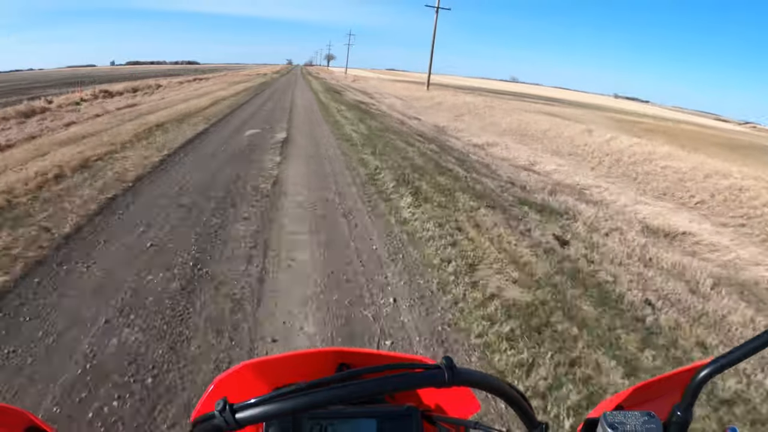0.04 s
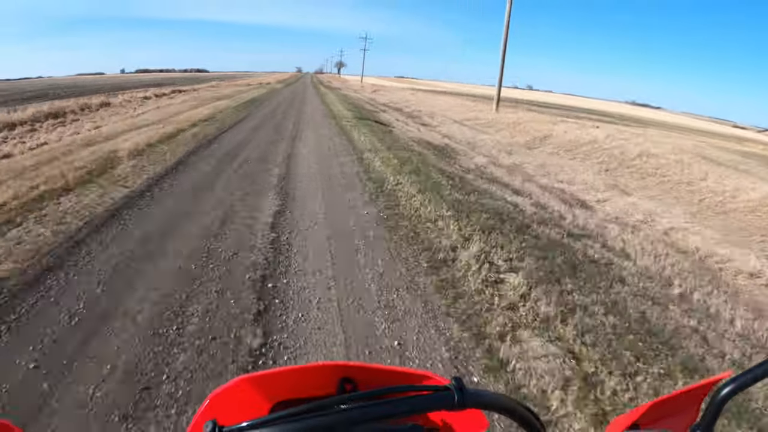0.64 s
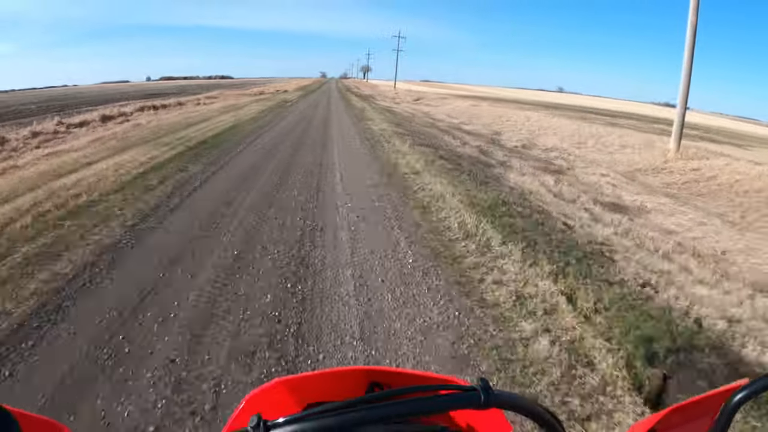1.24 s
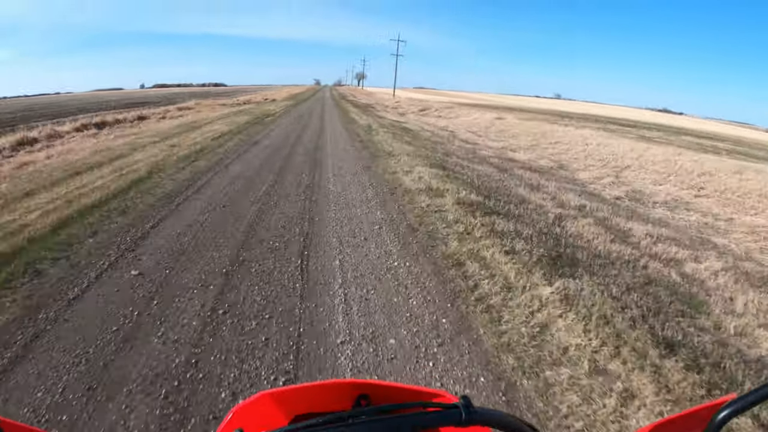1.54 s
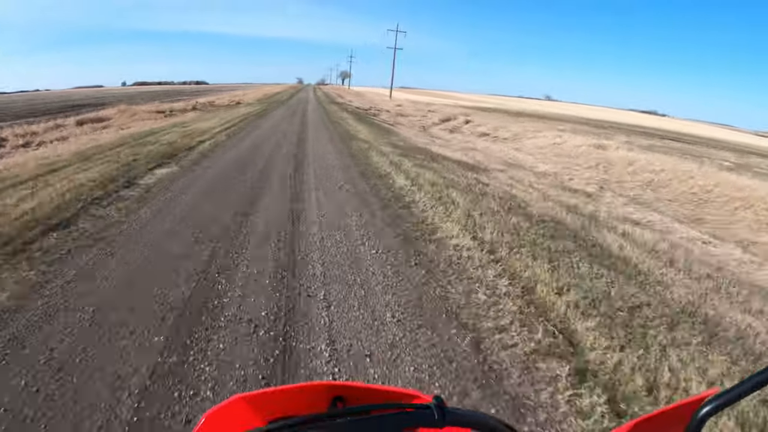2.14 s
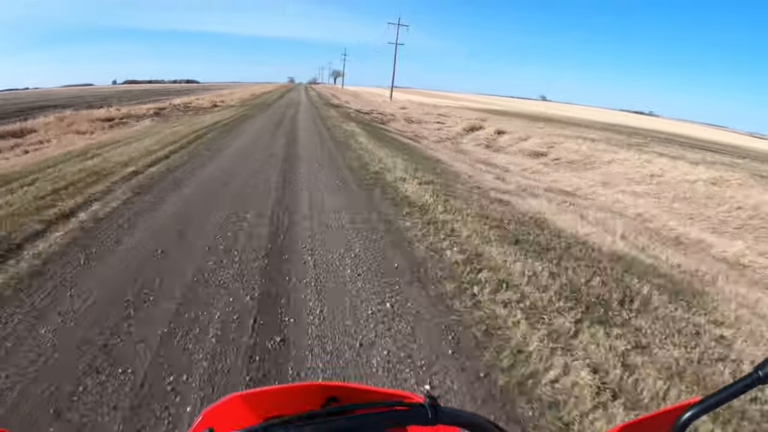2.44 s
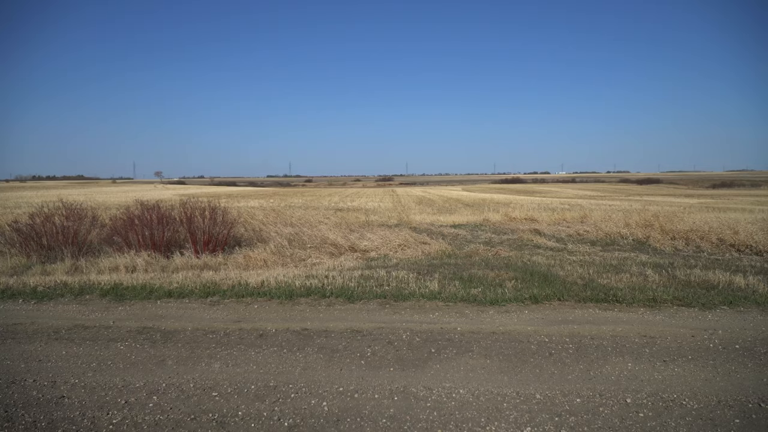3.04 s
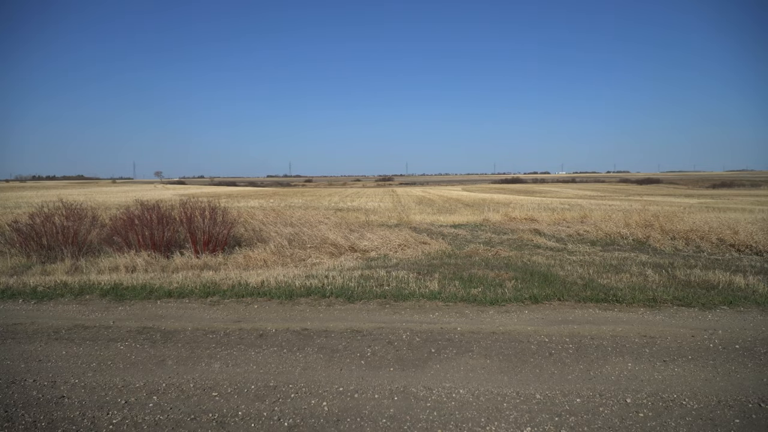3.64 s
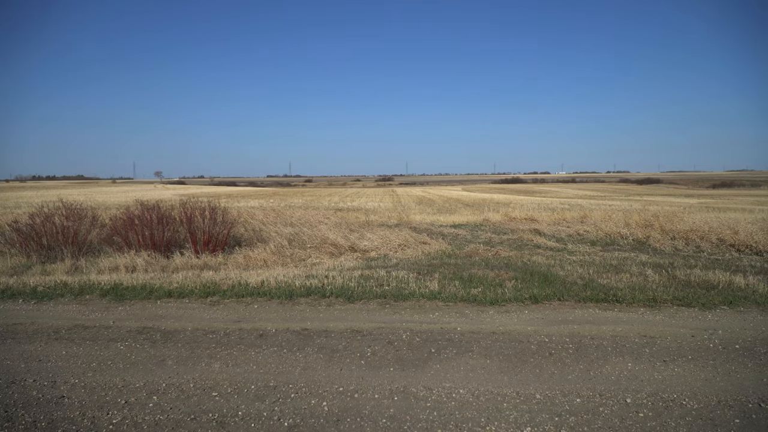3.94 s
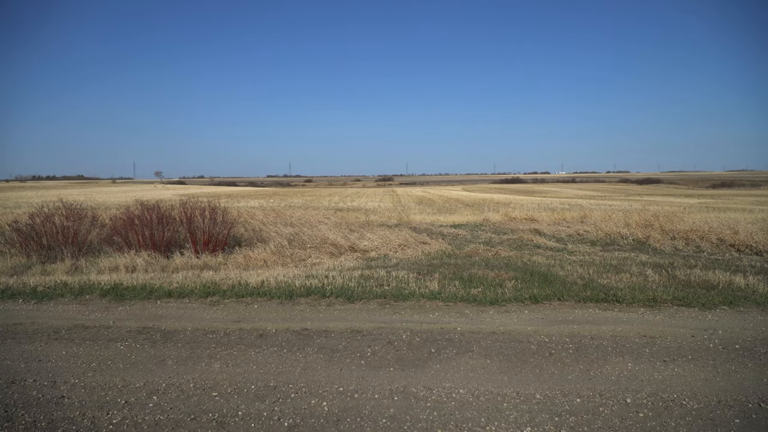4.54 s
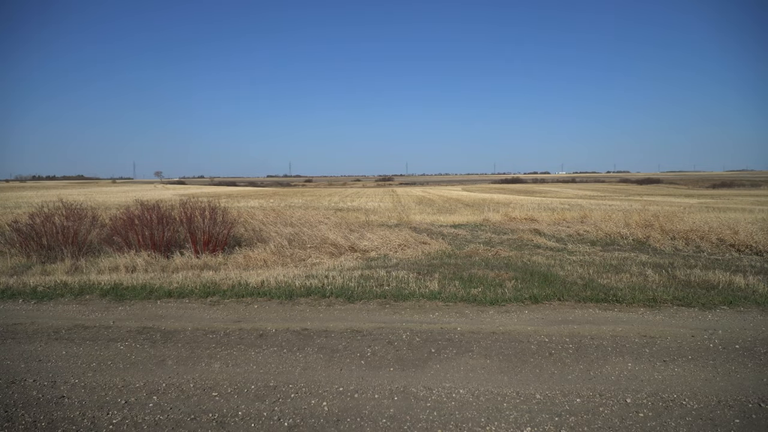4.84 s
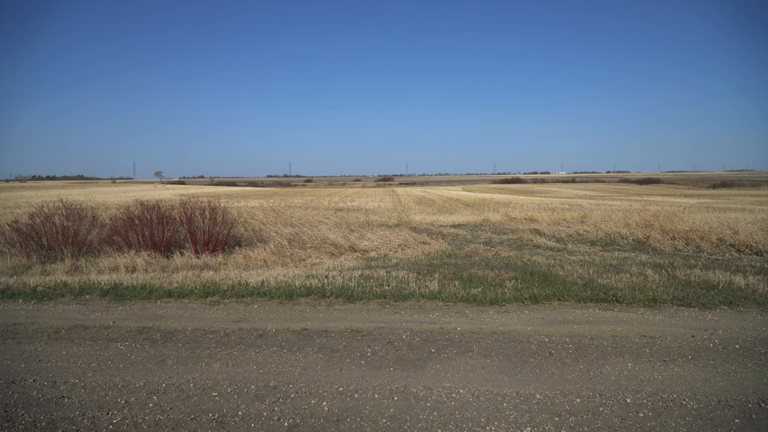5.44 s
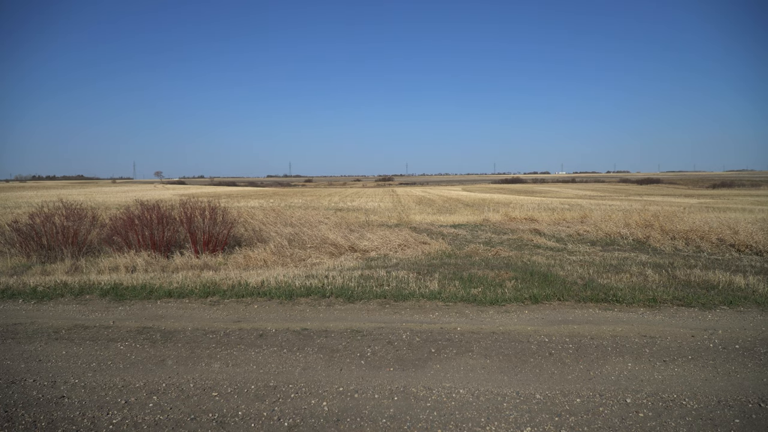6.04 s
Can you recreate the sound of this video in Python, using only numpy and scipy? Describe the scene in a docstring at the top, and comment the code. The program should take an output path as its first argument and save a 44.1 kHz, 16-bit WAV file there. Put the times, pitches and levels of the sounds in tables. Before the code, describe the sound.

Wind roars over a dirt bike ride, then from a quiet roadside a single-cylinder bike approaches, shifting up once, tyres hissing on gravel.

```python
"""First, wind roars over a microphone riding on a dirt bike, with the engine droning under it.
Then we are suddenly at a quiet roadside, in a light breeze. Far off, a single-cylinder four-stroke
bike pulls away, eases off, speeds up again and shifts up once. Last, it comes closer under throttle:
its firings make the exhaust boom and bark, its metal parts rattle and its tyres hiss on the gravel."""
import sys
import numpy as np
from scipy import signal
from scipy.fft import rfft, irfft, next_fast_len
from scipy.io import wavfile
from scipy.ndimage import uniform_filter1d

SR = 44100
rng = np.random.default_rng(int(sys.argv[2]) if len(sys.argv) > 2 else 0)


def master_out(mix):
    """Clip the mix to full scale and print it as 16-bit PCM to the path in sys.argv[1]."""
    frames = np.transpose(np.atleast_2d(mix))
    ceiling = np.clip(frames, -1, 1)
    pcm = np.round(ceiling * 32767).astype(np.int16)
    wavfile.write(sys.argv[1], SR, pcm)


N = 278271
TIME = np.arange(N) / SR


def from_db(db):
    """Turn decibels into a gain."""
    return 10 ** (np.asarray(db) / 20)


def rms_one(x):
    """Scale a sound so that its average strength (rms) is 1."""
    return x / np.sqrt(np.mean(x ** 2) + 1e-20)


def in_time(rows):
    """Draw straight lines between a table's rows: one curve for each column after the time."""
    times, *columns = np.transpose(rows)
    return [np.interp(TIME, times, column) for column in columns]


def at_hz(spectrum, hz):
    """Look up a spectrum's level in dB, with its frequencies spaced by octaves."""
    points, db = np.transpose(spectrum)
    return np.interp(np.log(hz), np.log(points), db)


def swell(at_s, half_s):
    """A bell-shaped bump of height 1."""
    return np.exp(-((TIME - at_s) / half_s) ** 2)


def coloured(x, spectrum):
    """Make each frequency of a sound louder or softer as a table says; rms 1."""
    size = next_fast_len(N)
    hz = np.maximum(np.arange(size // 2 + 1) * SR / size, 1)
    return rms_one(irfft(rfft(x, size) * from_db(at_hz(spectrum, hz)), size)[:N])


def noise(spectrum):
    """Noise with a given spectrum; rms 1."""
    return coloured(rng.standard_normal(N), spectrum)


def butter(x, hz, kind, order=2):
    """Keep the lows, the highs or a band (a Butterworth filter)."""
    return signal.sosfilt(signal.butter(order, hz, kind, fs=SR, output="sos"), x)


def drift(rate_hz):
    """A smooth random wobble; rms 1."""
    return rms_one(butter(rng.standard_normal(N + SR), rate_hz, "low")[SR:])


def resonate(x, hz, width_hz):
    """Ring at one frequency; the narrower the width, the longer the ring."""
    r = np.exp(-np.pi * width_hz / SR)
    feedback = [1, -2 * r * np.cos(2 * np.pi * hz / SR), r * r]
    return signal.lfilter(np.array([1, 0, -1]) * (1 - r * r) / 2, feedback, x)


def ring(x, modes):
    """Ring at several frequencies at once, every second one flipped in sign; rms 1."""
    return rms_one(sum((-1) ** k * from_db(db) * resonate(x, hz, width)
                       for k, (hz, width, db) in enumerate(modes)))


# Tone colour of the breeze over the fields: (frequency [Hz], level [dB])
BREEZE_SPECTRUM = [(12, -0.5), (24, -5), (50, -11.5), (100, -24), (300, -29.5), (500, -35), (700, -39.5),
                   (1000, -27.5), (1600, -50), (2500, -43), (5000, -55.5), (15000, -83)]
def breeze(level_db=-50.5, gust_db=1.0, hiss_db=-81.5):
    """A light breeze rises and falls over a faint, steady hiss."""
    gusts = from_db(level_db + gust_db * drift(1.5)) * noise(BREEZE_SPECTRUM)
    return gusts + from_db(hiss_db) * rng.standard_normal(N)


# Tone colour of the air rushing past the rider: (frequency [Hz], level [dB])
WIND_SPECTRUM = [(12, -24), (28, -8.5), (52, -2), (95, 0.5), (256, -2), (600, -8.5), (1580, -15.5),
                 (3440, -25), (5650, -39), (8000, -52), (10000, -63), (11500, -73.5), (15500, -95.5)]
# How the wind's fine hiss rises and falls: (time [s], relative level [dB])
WIND_HISS = [(0.03, -39.5), (0.06, -40), (1.18, -38), (1.19, -43.5), (1.32, -35), (1.39, -39), (1.47, -37),
             (1.48, -40), (1.57, -37), (1.79, -43.5), (1.85, -41), (1.9, -40), (2.13, -37.5), (2.32, -40.5),
             (2.69, -39.5), (2.71, -42.5)]
# The air lets go of the microphone and slaps back: (time [s], build-up [s], level change [dB])
WIND_LULLS = [(1.208, .015, -11), (1.213, .004, 6.5), (1.231, .014, -6)]
def riding_wind(rumble_db=-18.0, rush_db=-18.5, hiss_db=2.5, gust_db=-0.37, flutter_db=1.0, eddy_db=1.0):
    """Air swirls at the microphone: big swirls rumble and make the finer rush and hiss flutter."""
    rumble = rms_one(butter(noise(WIND_SPECTRUM), 249, "low", order=4))
    rush = rms_one(butter(noise(WIND_SPECTRUM), [250, 4000], "band", order=4))
    hiss = rms_one(butter(noise(WIND_SPECTRUM), 3910, "high", order=4))
    hiss_curve, = in_time(WIND_HISS)
    rush_curve = 0.43 * (hiss_curve - hiss_curve.mean())  # the rush partly follows the hiss
    slap_s = 0.0014
    lulls = sum(db * swell(s, np.where(TIME < s, build_s, slap_s)) for s, build_s, db in WIND_LULLS)
    eddies = eddy_db * rumble
    return (from_db(rumble_db + gust_db * drift(4.6)) * rumble
            + from_db(rush_db + rush_curve + eddies + lulls) * rush
            + from_db(hiss_db + hiss_curve + eddies + flutter_db * drift(48)) * hiss)


# The engine's strongest tone, heard by the rider: (time [s], pitch [Hz], relative level [dB])
DRONE_NOTE = [(0.1, 104.3, -43), (0.3, 100.2, -31.5), (0.54, 100.1, -44.5), (0.81, 105.9, -40.5),
              (1.01, 100.8, -23.5), (1.33, 106.9, -21), (1.62, 103.0, -16.5), (2.53, 102.8, -33.5),
              (2.65, 100.1, -24)]
def engine_drone(level_db=-4.5, waver_db=-3.5):
    """The engine under the rider hums at one, two and three times its firing rate."""
    hz, level_curve = in_time(DRONE_NOTE)
    phase = np.pi * np.cumsum(hz) / SR  # the engine fires at half the listed pitch
    tones = from_db(-4.0) * np.sin(phase) + np.sin(2 * phase) + from_db(-14.5) * np.sin(3 * phase)
    return np.sqrt(2) * tones * from_db(level_curve + level_db + waver_db * drift(4.8))


def on_the_bike(window_s=0.019, squeeze=0.52):
    """Drone and wind, turned down whenever they swell, so that the bass pumps the treble."""
    sound = engine_drone() + riding_wind()
    power = uniform_filter1d(sound ** 2, int(window_s * SR))
    power = uniform_filter1d(power, int(window_s * SR / 2))
    return sound * (power / np.mean(power) + 1e-6) ** (-squeeze / 2)


def distance(speed_m_per_s=16.04, alongside_s=7.252, to_road_m=7.7):
    """Metres from the listener to the bike, which comes along the road at a steady speed."""
    return np.hypot(to_road_m, speed_m_per_s * (alongside_s - TIME))


def loudness(firing_hz, throttle, base_db, nearer_db, octave_db, shut_db):
    """Level in dB: add nearer_db as the distance halves, octave_db as revs double, shut_db off throttle."""
    base_m, base_hz = 16.85, 74
    return (base_db + nearer_db * np.log2(base_m / distance())
            + octave_db * np.log2(firing_hz / base_hz) + shut_db * (1 - throttle))


def through_air(x, level_db, clear_db=-53.0, slope=1.0, dull_hz=3100):
    """Set a sound's level; the further it falls below clear_db, the duller and more distant it sounds."""
    treble_gain = from_db(slope * np.clip(level_db - clear_db, -20, 0))
    low, low_and_mid = (signal.sosfiltfilt(signal.butter(3, hz, fs=SR, output="sos"), x)
                        for hz in (dull_hz, 2 * dull_hz))
    mid, high = low_and_mid - low, x - low_and_mid
    return from_db(level_db) * (low + treble_gain * mid + treble_gain ** 2 * high)


# Tone colour of tyres on gravel: (frequency [Hz], level [dB])
GRAVEL_SPECTRUM = [(150, -6), (400, -7), (800, -21), (1800, -4.5), (3000, -5), (3900, -1), (5000, -7),
                   (5800, -12.5), (6400, -18.5), (7100, -21.5), (8000, -21), (10000, -33.5), (12500, -36),
                   (15500, -45)]
# The gravel grows louder as the bike nears: (time [s], level before dulling [dB])
GRAVEL_LEVEL = [(2.8, -87), (3.42, -64.5), (3.78, -64.5), (4.0, -59), (4.35, -52.5), (4.55, -55.5),
                (4.8, -52), (4.95, -50), (5.2, -49), (5.4, -45.5), (5.85, -40.5), (6.12, -37.5),
                (6.3, -40.5)]
def tyres(stones_per_s=600, stone_db=-3):
    """Gravel hisses under the knobbly tyres and single stones click."""
    stones = (rng.random(N) < stones_per_s / SR) * rng.standard_normal(N)
    crunch = coloured(rng.standard_normal(N) + from_db(stone_db) * rms_one(stones), GRAVEL_SPECTRUM)
    return through_air(crunch, in_time(GRAVEL_LEVEL)[0], clear_db=-48, slope=0.97, dull_hz=3800)


def pulses(cycle, rough, puff_s, uneven_db=-2.0):
    """One crack and a puff of noise each engine cycle; the rougher the engine, the more puff."""
    starts = np.diff(np.floor(cycle), prepend=np.floor(cycle[0]))
    cracks = starts * from_db(uneven_db * rough * rng.standard_normal(N))
    puffs = signal.lfilter([1], [1, -np.exp(-1 / (puff_s * SR))], cracks) * rng.standard_normal(N)
    return np.sqrt(1 - rough ** 2) * rms_one(cracks) + rough * rms_one(puffs)


def knocks(cycle, rough, hits, modes, puff_s):
    """Hits that come round every cycle make a metal part ring, never quite alike."""
    return ring(sum(from_db(db) * pulses(cycle + 1 - at, rough, puff_s) for at, db in hits), modes)


# Tone colour of the engine casing and chain: (frequency [Hz], level [dB])
CASING_SPECTRUM = [(300, -7), (600, -1.5), (1150, 3.5), (1500, -2), (1800, -2), (2000, 6.5), (2350, -1),
                   (3000, -10), (3900, -14), (5000, -31), (6500, -30), (8000, -30), (10000, -29),
                   (15500, -52)]
def gears_and_chain(cycle, rough, loose=0.52, beat_db=3.5):
    """Gears and chain repeat one rattle every cycle, partly loose and loudest just after each firing."""
    size = 2048
    harmonics = np.exp(2j * np.pi * rng.random(size // 8))
    pattern = irfft(np.r_[0, harmonics], size)
    rattle = np.interp(cycle % 1, np.arange(size) / size, pattern, period=1)
    noisy = np.clip(loose + rough / 2, 0, 1)
    rattle = np.sqrt(1 - noisy ** 2) * rms_one(rattle) + noisy * rng.standard_normal(N)
    beat = from_db(beat_db * np.cos(2 * np.pi * (cycle - .1)))
    return coloured(rattle * beat, CASING_SPECTRUM)


SIDE_POWER = 3.4  # side-on sounds come in late in the turn: the share is raised to this power

# The piston knocks on both turns of the crank: (place in the cycle [0-1], level [dB])
PISTON_HITS = [(0, -6), (.5, 0)]
# Ringing of the cylinder barrel: (frequency [Hz], width [Hz], level [dB])
BARREL_MODES = [(1284, 200, 4.5), (1465, 140, 5), (1604, 93, 7), (1796, 56, 4.5), (1880, 110, -6.5)]
def piston(cycle, rough, side_on, level_db=-3.0, hidden_db=-5.5):
    """The piston knocks on the cylinder barrel, which is heard best from the side."""
    barrel = knocks(cycle, 0.5 * rough, PISTON_HITS, BARREL_MODES, puff_s=0.0015)
    gain = from_db(level_db + hidden_db * (1.5 - side_on ** SIDE_POWER))
    return gain * rms_one(butter(barrel, [1150, 2300], "band"))


# The valves open and shut: (place in the cycle [0-1], level [dB])
VALVE_HITS = [(.03, 0), (.29, -7), (.55, -5), (.82, -10)]
# Ringing of the cylinder head: (frequency [Hz], width [Hz], level [dB])
HEAD_MODES = [(2340, 185, 1.5), (2606, 100, 2), (2775, 52, -1), (3110, 83, -4), (3430, 64, -6),
              (3740, 310, -5.5), (4530, 360, -20), (5850, 190, -28), (7940, 700, -29)]
def valves(cycle, rough):
    """The valves strike the cylinder head with a crisp ticking."""
    head = knocks(cycle, np.clip(1.1 * rough, 0, 1), VALVE_HITS, HEAD_MODES, puff_s=0.0025)
    return rms_one(butter(head, [1900, 7000], "band"))


# Louder rattling where the revs peak and while coasting: (time [s], half-length [s], boost [dB])
RATTLE_FLARES = [(3.416, 0.058, 3.5), (3.55, 0.41, 5), (4.357, 0.072, 1)]
def engine_rattle(cycle, firing_hz, throttle, rough, side_on, gears_db=-4):
    """All the engine's metal parts together, dulled by the air while the bike is far away."""
    metal = valves(cycle, rough) + piston(cycle, rough, side_on)
    metal += from_db(gears_db) * gears_and_chain(cycle, rough)
    level_db = loudness(firing_hz, throttle, base_db=-33, nearer_db=19, octave_db=18, shut_db=2)
    flare_db = sum(db * swell(s, half_s) for s, half_s, db in RATTLE_FLARES)
    return from_db(flare_db) * through_air(metal, level_db)


def wavering_tone(turns, phase_rough, level_rough, waver_rad=.7, waver_db=3, waver_hz=22):
    """One tone of the engine; uneven firing makes its pitch and level flutter."""
    phase = 2 * np.pi * turns + waver_rad * phase_rough * drift(waver_hz)
    return np.sqrt(2) * from_db(waver_db * level_rough * drift(waver_hz)) * np.cos(phase)


# How the exhaust shapes its low tones, head-on from afar: (frequency [Hz], level [dB])
BOOM_FRONT = [(60, -9), (100, 4.5), (125, 8), (158, 0), (195, -2), (235, -2.5), (268, -4.5), (292, -17.5),
              (328, -5.5), (365, -13), (430, -19), (505, -14), (575, -22.5), (700, -18.5)]
# The same, side-on from close by: (frequency [Hz], level [dB])
BOOM_SIDE = [(72, -6.5), (146, 1.5), (218, -11), (292, -1.5), (360, -30), (435, -33), (490, -18.5),
             (518, -4.5), (580, -19), (655, -13)]
# Coasting, the piston pumps twice a cycle and the note turns hollow; harmonics 1 to 9: (level [dB])
BOOM_HOLLOW = [-4, 3.5, -11, -2, -20, -19, -14.5, -22, -30]
def exhaust_boom(cycle, firing_hz, coasting, rough, side_on):
    """Low tones at multiples of the firing rate (harmonics); the higher ones are more ragged."""
    side = (side_on / side_on.max()) ** SIDE_POWER
    boom = 0
    for k, hollow_db in enumerate(BOOM_HOLLOW, 1):
        front_db = (1 - coasting) * at_hz(BOOM_FRONT, k * firing_hz) + coasting * hollow_db
        db = (1 - side) * front_db + side * at_hz(BOOM_SIDE, k * firing_hz)
        ragged = rough * (k / 5) ** 1.3
        boom += from_db(db) * wavering_tone(k * (cycle + k / 20), ragged, ragged)
    return np.sqrt(2) * boom / np.sqrt(2)


def exhaust_honk(cycle, rough, harmonic=17, level_db=-2.5):
    """Labouring after the gear shift, the exhaust honks briefly on one tone."""
    return from_db(level_db) * swell(4.66, .08) * wavering_tone(harmonic * cycle, 2 * rough, rough)


def whine(cycle, rough, side_on, harmonic=13, front_db=-4, side_db=-9):
    """A whine that climbs with the revs, clearest head-on."""
    gain = from_db(front_db + side_db * side_on) * np.sqrt(1 - rough)
    return gain * wavering_tone(harmonic * cycle, 2 * rough, rough)


# Ringing of the silencer, head-on from afar: (frequency [Hz], width [Hz], level [dB])
SILENCER_FRONT = [(858, 140, 2.5), (1047, 78, 2), (1110, 58, 2.5), (1240, 320, -5), (1397, 47, -0.5),
                  (1590, 190, -10)]
# The same, side-on from close by: (frequency [Hz], width [Hz], level [dB])
SILENCER_SIDE = [(736, 59, 1), (950, 143, 1.5), (1037, 81, 0.5), (1133, 64, -6)]
def exhaust_bark(cycle, rough, side_on, delay_s=0.00213):
    """The firings ring the silencer: a nasal note whose colour changes as the bike comes near."""
    firings = np.pad(pulses(cycle, rough, puff_s=0.038), (int(delay_s * SR), 0))[:N]
    side = side_on ** 0.12  # this colour changes early in the turn
    note = np.sqrt(side) * ring(firings, SILENCER_SIDE) + np.sqrt(1 - side) * ring(firings, SILENCER_FRONT)
    return rms_one(butter(note, 777, "high", order=6))


def exhaust_cough(at_s=4.538, half_s=0.022, level_db=-51):
    """The silencer coughs as the firing catches again."""
    breath = rms_one(butter(ring(rng.standard_normal(N), SILENCER_FRONT), [750, 1150], "band"))
    return from_db(level_db) * swell(at_s, half_s) * breath


def exhaust_gas(side_on, level_db=-12.5):
    """Head-on, a breathy rush of gas runs on between the firings."""
    return (1 - side_on) * from_db(level_db) * rms_one(butter(rng.standard_normal(N), (300, 680), "band"))


# The firing drops out as the clutch is pulled and let in: (time [s], half-length [s], dip [dB])
CLUTCH_DIPS = [(4.422, 0.021, -18), (4.531, 0.011, -13)]
def exhaust(cycle, firing_hz, throttle, coasting, hoarse, rough, side_on):
    """Everything from the exhaust pipe; the gear shift dips the boom deeply and the bark a little."""
    dip_db = sum(db * swell(s, half_s) for s, half_s, db in CLUTCH_DIPS)
    boom_db = loudness(firing_hz, throttle, base_db=-38, nearer_db=7, octave_db=16, shut_db=-3.5)
    bark_db = loudness(firing_hz, throttle, base_db=-34, nearer_db=12.5, octave_db=16.5, shut_db=-5.5)
    bark_db += 0.26 * dip_db - 2.5 * side_on - 1.5 * hoarse
    boom = exhaust_boom(cycle, firing_hz, coasting, rough, side_on)
    bark = exhaust_bark(cycle, rough, side_on) + exhaust_honk(cycle, rough) + whine(cycle, rough, side_on)
    return (from_db(boom_db + dip_db) * boom + from_db(bark_db) * bark
            + exhaust_cough() + from_db(boom_db) * exhaust_gas(side_on))


# The revs climb through one gear, then the next: (time [s], firing rate [Hz])
ENGINE_SPEED = [(2.78, 47.6), (2.95, 47.3), (3.02, 50.5), (3.21, 61.6), (3.38, 63.2), (3.44, 67.2),
                (3.57, 64.8), (3.7, 66.7), (3.86, 72.1), (4.14, 74.8), (4.38, 79.5), (4.46, 74.5),
                (4.55, 60.2), (4.75, 67.4), (5.0, 72.4), (5.22, 72.4), (5.29, 74.0), (5.34, 71.8),
                (5.39, 73.4), (5.44, 70.8), (5.53, 70.5), (6.3, 74.5)]
# The rider opens the throttle in two steps, and again after the shift: (time [s], opening [0-1])
THROTTLE_OPENING = [(2.94, 0), (3.06, 0.4), (3.7, 0.4), (3.87, 0.9), (4.37, 0.6), (4.47, 0.4), (4.58, 0.8),
                    (4.84, 0.62), (4.95, 0.84)]
# The engine coasts when the rider eases off, and during the shift: (start [s], end [s])
COASTING_SPANS = [(3.391, 3.75), (4.42, 4.545)]
def approaching_bike(rough_shut=.45, rough_open=.06, rough_per_m=.005, coast_edge_s=.02):
    """Engine speed, throttle and distance drive the exhaust and the rattle, over the hiss of the tyres."""
    firing_hz, = in_time(ENGINE_SPEED)
    throttle, = in_time(THROTTLE_OPENING)
    coasting = sum(np.tanh((TIME - start) / coast_edge_s) - np.tanh((TIME - end) / coast_edge_s)
                   for start, end in COASTING_SPANS) / 2
    hoarse = swell(5.36, 0.13)  # the note turns hoarse and softer for a moment
    # How unevenly the engine fires, from 0 to 1; air and ground blur the note more with every metre.
    rough = rough_shut + (rough_open - rough_shut) * throttle + .3 * hoarse + .12 * coasting
    rough = np.clip(rough + rough_per_m * distance(), 0, 1)
    side_on = np.interp(TIME, [4.45, 5.46], [0, 0.98])  # the bike turns: 0 is head-on, 1 is side-on
    cycle = np.cumsum(firing_hz * (1 + .005 * rough * drift(25))) / SR  # counts up by 1 each firing
    return (exhaust(cycle, firing_hz, throttle, coasting, hoarse, rough, side_on)
            + engine_rattle(cycle, firing_hz, throttle, rough, side_on) + tyres())


def scene(roadside_s=2.748, fade_s=.002):
    """First on the bike, then suddenly beside the road."""
    riding = np.clip((roadside_s - TIME) / fade_s, 0, 1)
    return (riding * on_the_bike() + (1 - riding) * (approaching_bike() + breeze()))[None]


def record(dry, ceiling=.75, cutoff_hz=17000):
    """Round off the highest peaks and cut the very top of the treble."""
    rounded = dry / (1 + (dry / ceiling) ** 6) ** (1 / 6)
    return signal.sosfilt(signal.cheby2(12, 70, cutoff_hz, fs=SR, output="sos"), rounded)


dry = scene()
out = record(dry)
master_out(out)
```